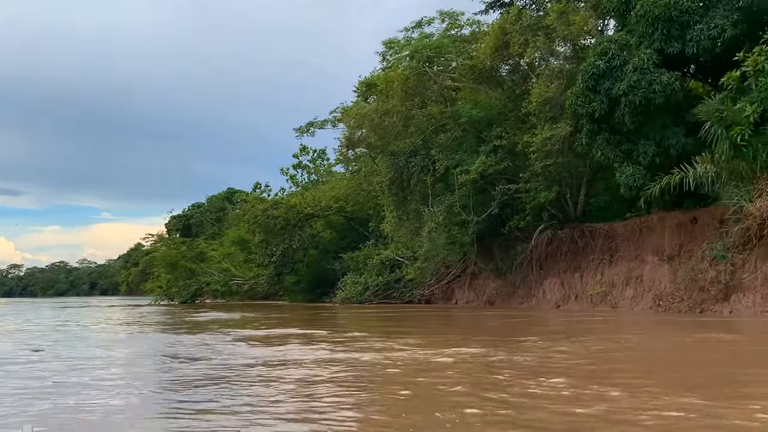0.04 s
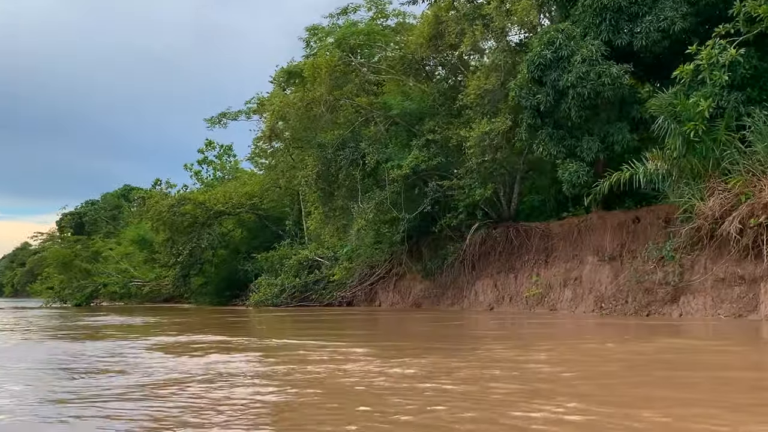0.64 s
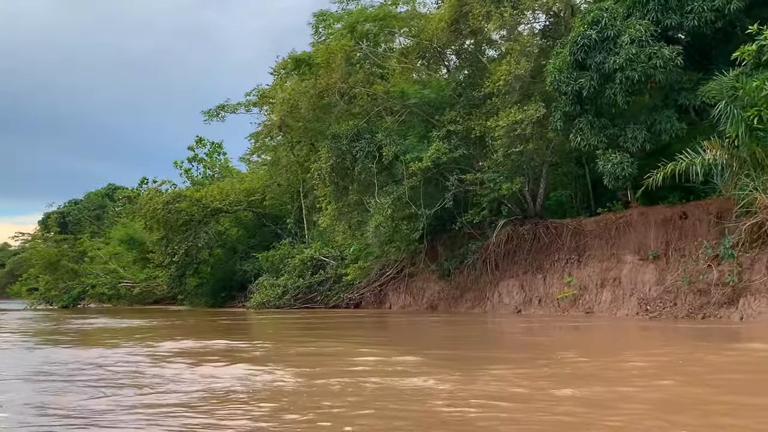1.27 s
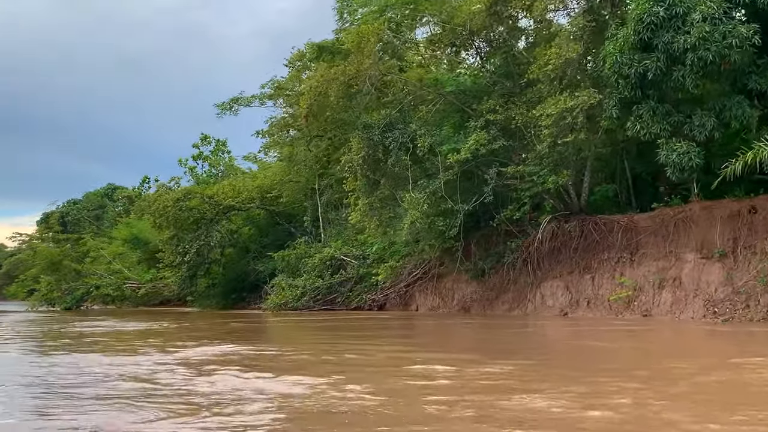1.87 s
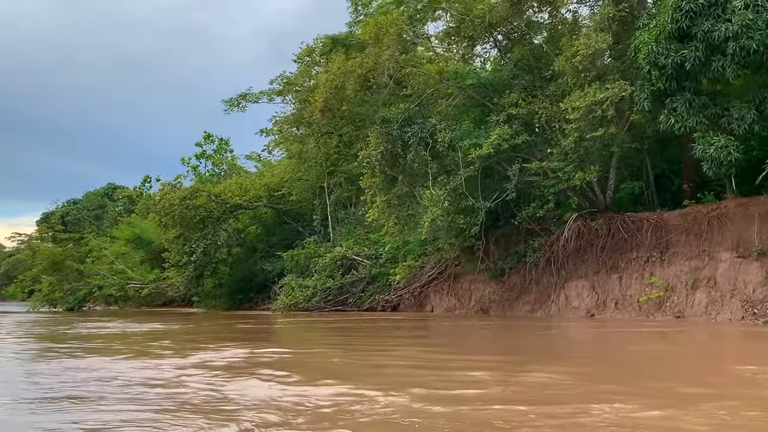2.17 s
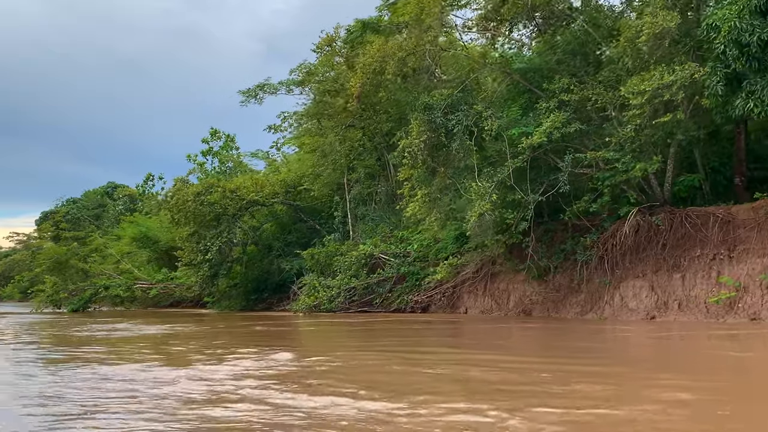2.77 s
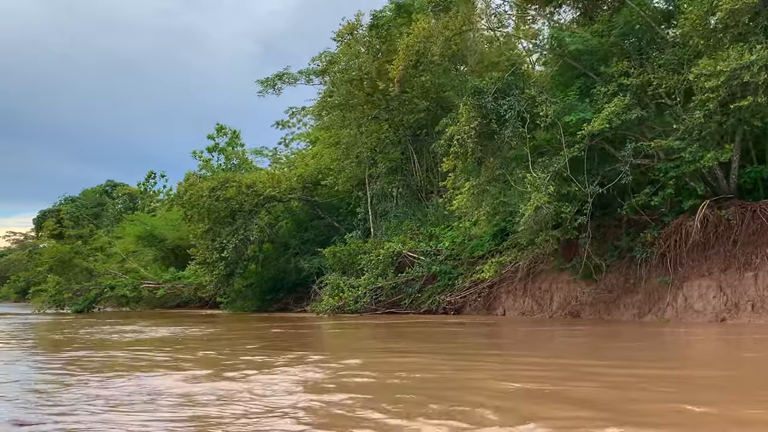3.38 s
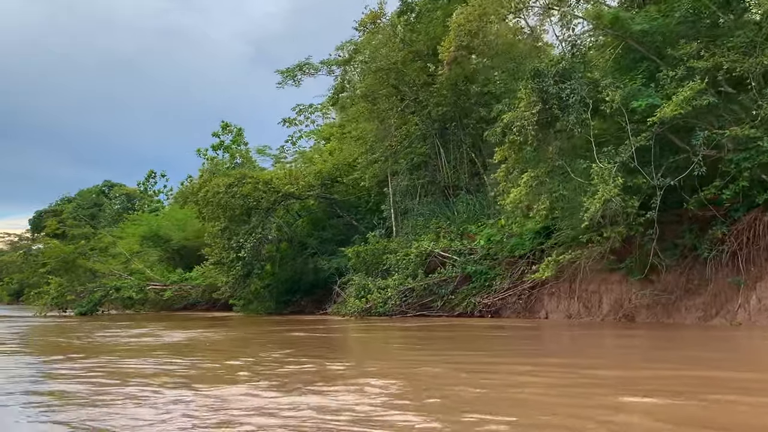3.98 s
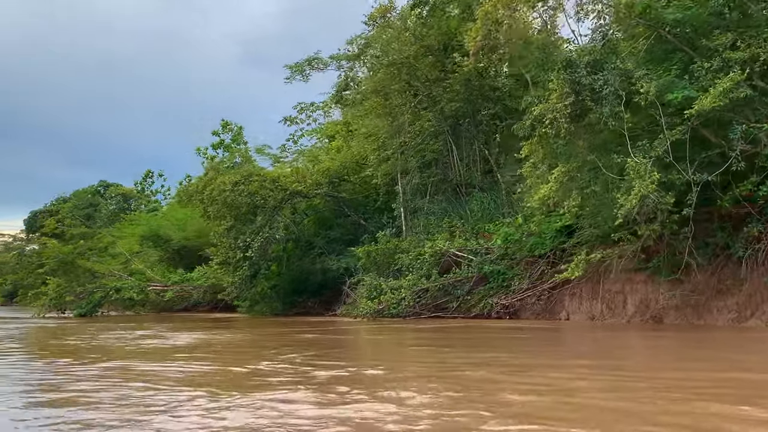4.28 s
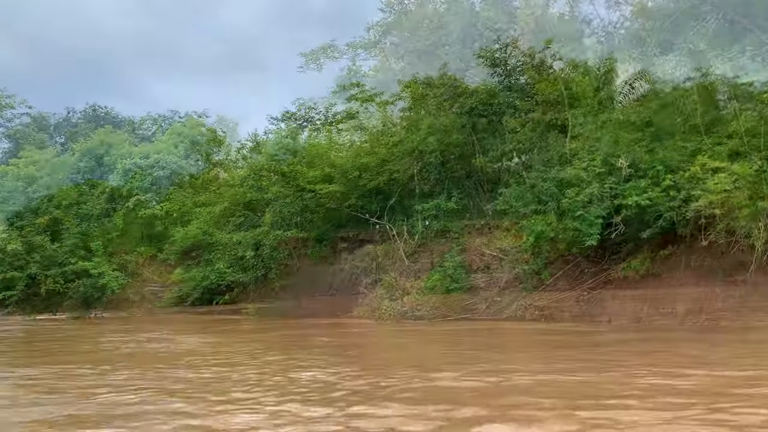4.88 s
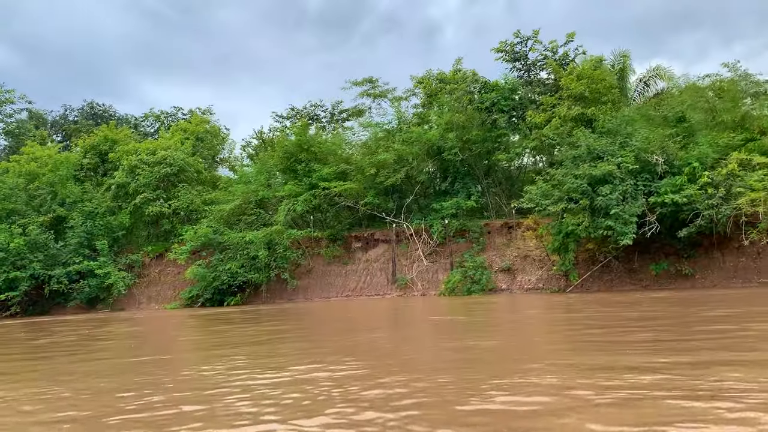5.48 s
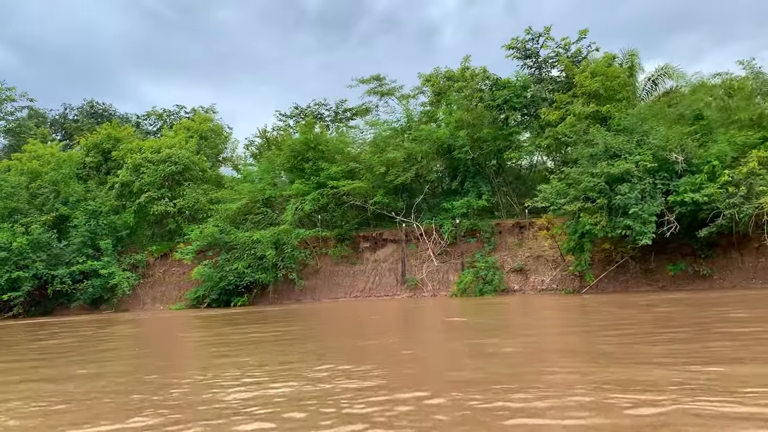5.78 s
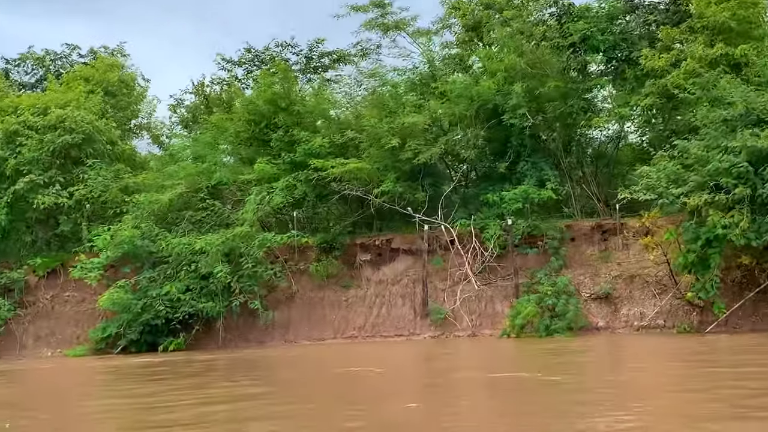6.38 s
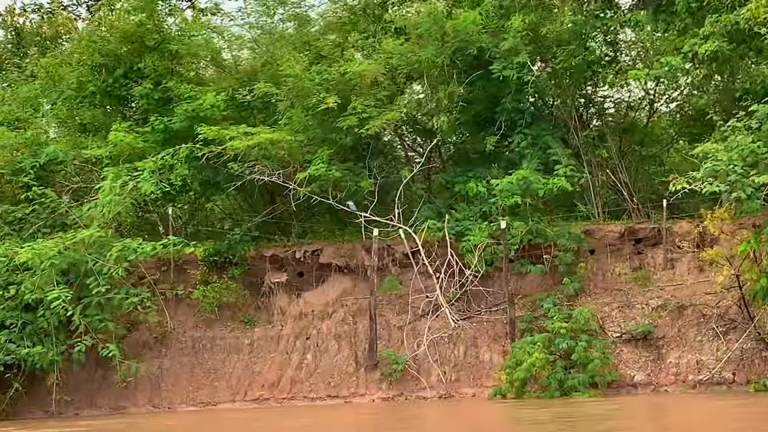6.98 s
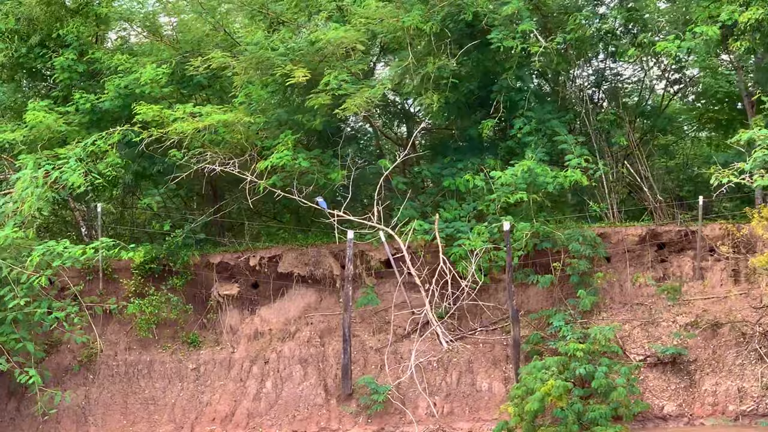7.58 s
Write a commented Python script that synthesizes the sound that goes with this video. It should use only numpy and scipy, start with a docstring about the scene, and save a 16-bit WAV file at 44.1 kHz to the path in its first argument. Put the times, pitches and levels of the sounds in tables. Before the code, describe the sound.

From the start, a one-cylinder boat motor throbs low and steady, about sixteen beats a second, wavering slightly. It is heard from on board, with gusty wind rumble and a rushing bow wave. Waves knock dully under the hull and slap its side with bubbly plops and small droplets, most sharply around 1.5 and 1.7 seconds. Faint short bird whistles come from the bank in the first second and again near 2.4 seconds. More knocks gather between 4 and 4.8 seconds.

From about 4.4 to 5.2 seconds the motor, wind and rush fade into a quieter low drone with gently lapping, trickling water. A faint, high cicada buzz enters and grows slightly. Gurgles and plops cluster around 5.6 seconds and recur until the end. From 6.4 seconds a small bird twitters thinly, joined near 6.9 by a run of soft raspy pips lasting to about 7.6 seconds.

```python
"""A one-cylinder boat motor throbs along a jungle river, its firings exciting exhaust and hull resonances.
Air buffets the boat, the bow wave rushes, and waves slap and knock at the hull, trapping bubbles that ring.
Around five seconds the motor fades away and leaves a low drone, lapping water and the tymbal buzz of
cicadas. A few birds whistle on the bank, their calls scattered by the trees."""
import sys
import numpy as np
from scipy import signal
from scipy.fft import rfft, irfft, next_fast_len
from scipy.io import wavfile
from scipy.ndimage import uniform_filter1d

SR = 44100
rng = np.random.default_rng(int(sys.argv[2]) if len(sys.argv) > 2 else 0)


def master(y):
    """Save y as 16-bit WAV."""
    cut = np.clip(np.atleast_2d(y).T, -1, 1)
    pcm = np.round(cut * 32767)  # scale
    wavfile.write(sys.argv[1], SR, pcm.astype(np.int16))


N = 336924

# likeness of left and right: (frequency [Hz], correlation [0 to 1])
CORRELATION = [(30, 0.89), (300, 0.96), (600, 0.079), (1000, 0.28), (1600, 0.0093), (4500, 0.013),
               (6000, 0.092), (7500, 1), (10000, 1), (16000, 1)]


def from_db(db):
    """Amplitude ratio of a level in decibels."""
    return 10 ** (np.asarray(db) / 20)


def rms_one(x):
    """Normalisation to unit root-mean-square amplitude."""
    return x / np.sqrt(np.mean(x ** 2) + 1e-20)


def match_power(x, envelope):
    """Normalisation to the mean power of an envelope."""
    return rms_one(x) * np.sqrt(np.mean(envelope ** 2))


def decay(t, t60):
    """Exponential damping: 60 dB down after t60 seconds."""
    return from_db(-60 * t / t60)


def in_time(curve):
    """Linear interpolation of (time, value) points at every sample."""
    return np.interp(np.arange(N) / SR, *np.transpose(curve))


def at_hz(points, hz):
    """Interpolation of (frequency, value) points on a logarithmic frequency axis."""
    frequencies, values = np.transpose(points)
    return np.interp(np.log(hz), np.log(frequencies), values)


def ramp(start_s, length_s):
    """Linear rise from 0 to 1."""
    return np.clip((np.arange(N) / SR - start_s) / length_s, 0, 1)


def drift(corner_hz):
    """Random modulation: low-passed noise of unit spread, computed on every 40th sample."""
    pole = np.exp(-2 * np.pi * corner_hz * 40 / SR)
    slow = signal.lfilter([1], [1, -2 * pole, pole * pole], rng.standard_normal(N // 40 + 2002))[2000:]
    return np.interp(np.arange(N) / 40, np.arange(len(slow)), rms_one(slow))


def band(x, low_hz, high_hz):
    """Butterworth band-pass filter."""
    sections = signal.butter(2, [low_hz, min(high_hz, .48 * SR)], "band", fs=SR, output="sos")
    return signal.sosfilt(sections, x + 1e-18)


def resonate(x, hz, width_hz):
    """Damped resonator with unit gain at its peak."""
    r = np.exp(-np.pi * width_hz / SR)
    feedback = [1, -2 * r * np.cos(2 * np.pi * hz / SR), r * r]
    return signal.lfilter(np.array([1, 0, -1]) * (1 - r * r) / 2, feedback, x + 1e-18)


def stereo(pair, correlation):
    """Sum and difference of two independent signals give partly correlated left and right."""
    mid = np.sqrt(1 + correlation) * pair[0]
    side = np.sqrt(1 - correlation) * pair[1]
    return np.array([mid + side, mid - side]) / np.sqrt(2)


def add(out, s, sound):
    """Superposition of a sound starting at s seconds."""
    i = max(0, round(s * SR))
    out[..., i:i + sound.shape[-1]] += sound[..., :N - i]


def banded_noise(spectrum, patchy_db, surge_db, correlation=None):
    """Amplitude-modulated noise: half-octave bands surge together and flicker apart."""
    out, surge = 0, surge_db * drift(16)
    edges = 20 * 2 ** np.arange(0, 10.1, .5)
    white = rng.standard_normal((2, 2, N))
    for k, (low, high) in enumerate(zip(edges, edges[1:])):
        hz = np.sqrt(low * high)
        if spectrum[0][0] <= hz <= spectrum[-1][0] * np.sqrt(2):
            gain = from_db(at_hz(spectrum, hz) + surge + patchy_db * drift(24))
            alike = at_hz(CORRELATION, hz) if correlation is None else correlation
            out = out + gain * stereo(band(white[k % 2], low, high), alike)
    return rms_one(out)


def periodic_wave(turns, harmonics=64):
    """Fourier series: equally strong harmonics in random phase repeat on every turn."""
    cycle = irfft(np.r_[0, np.exp(2j * np.pi * rng.random(harmonics))], 2048)
    return rms_one(np.interp(turns % 1, np.linspace(0, 1, len(cycle)), cycle))


def motor(jitter_turns=.009, uneven_db=4.5, easing_db_per_s=.27, churn_db=2):
    """Forced vibration: one cylinder's shake, thump and puff of gas drive exhaust and hull resonances."""
    # engine speed: (time [s], firing rate [Hz])
    speed = [(0, 15.9), (.4, 16.05), (.8, 15.75), (1.3, 15.1), (1.8, 15.68), (2.1, 15.68), (2.42, 15.35),
             (2.78, 16.27), (3.4, 16.25), (3.65, 16.05), (4.8, 16.55)]
    # exhaust and hull resonances: (frequency [Hz], bandwidth [Hz], level [dB])
    modes = [(61.3, 45, 2.5), (81, 27, 3.5), (130.8, 21, 4), (158.2, 26, 1.5), (182.2, 23, 0),
             (240, 85, -11), (315.4, 31, -.5), (350.5, 20, 1.5), (383, 24, -3.5), (519.7, 24.3, -8),
             (578, 22, -10.5), (905, 1100, -26.5)]
    churn = churn_db * drift(9.7)   # water washing over the exhaust makes its level waver
    level_db = -26 - easing_db_per_s * np.arange(N) / SR + churn
    turns = np.cumsum(in_time(speed)) / SR + jitter_turns * drift(3.7)
    shake = periodic_wave(turns) + .56 * drift(2.6) * periodic_wave(turns)   # shape varies with the load
    firings = np.diff(np.floor(turns), prepend=0) * from_db(uneven_db * rng.standard_normal(N))
    gas = band(stereo(rng.standard_normal((2, N)), .11), 32, 1200)
    puffs = rms_one(np.exp(-1.5 * (turns % 1)) * gas)
    drive = shake + .25 * rms_one(band(firings, 31, 1220)) + .58 * puffs
    size = next_fast_len(N)
    f = np.arange(size // 2 + 1) * SR / size
    power = sum((from_db(db) / (1 + (2 * (f - hz) / width) ** 2)) ** 2 for hz, width, db in modes)
    return from_db(level_db) * rms_one(irfft(rfft(drive, size) * np.sqrt(power), size)[:, :N])


def buffeting():
    """Turbulent pressure: gusts of air against the boat make a low rumble."""
    # gust strength: (time [s], level [dB])
    gusts = [(0, -2), (.8, 2.5), (1.3, -2.5), (2.15, 1.5), (2.3, -9), (2.76, 0.5), (2.83, 3), (3.2, -1),
             (4.2, 1)]
    # rumble of the air: (frequency [Hz], spectral density [dB])
    spectrum = [(15, -14), (28, -4), (50, 2), (90, -3.5), (160, -8.5), (230, -14), (300, -17), (500, -19.5),
                (1500, -72)]
    return from_db(-28.5 + in_time(gusts)) * banded_noise(spectrum, patchy_db=2.5, surge_db=.5)


def bubbles(per_s, spread_db, low_hz, high_hz, q, pitches=16):
    """Bubble resonance: random impulses ring a range of pitches; small bubbles are higher and fainter."""
    strengths = from_db(spread_db * np.minimum(rng.exponential(1, N), 3)) * rng.choice([-1, 1], N)
    impulses = strengths * (rng.random(N) < per_s / SR)
    out, pitch_index = 0, rng.integers(0, pitches, N)
    for k, hz in enumerate(np.geomspace(low_hz, high_hz, pitches)):
        kicks = impulses * (pitch_index == k) * rng.standard_normal((2, N))
        out = out + stereo(resonate(kicks, hz, hz / q), at_hz(CORRELATION, hz)) / hz
    return rms_one(out)


def bow_wave():
    """Air entrainment: the rushing bow wave swells together with its bubbles and fine fizz."""
    # strength of the bow wave: (time [s], level [dB])
    wash = [(0, 2), (.12, -1.5), (.2, 0), (.6, 2), (1.0, 1.5), (1.35, -1), (1.7, 1.1), (2.05, 0),
            (2.55, -0.5), (2.75, 1), (3.25, 1.5), (3.62, -0.5), (3.78, 1), (4.35, -0.1), (4.65, 1.5),
            (4.8, 4)]
    # rushing water: (frequency [Hz], spectral density [dB])
    spectrum = [(100, -33), (330, -35), (450, 8), (700, 1), (1300, -4), (2500, -14.5), (5000, -16),
                (7000, -22), (10500, -23.5), (13000, -24.5), (16000, -50)]
    rush = from_db(-39) * banded_noise(spectrum, patchy_db=1.6, surge_db=.7)
    froth = from_db(-49) * bubbles(per_s=420, spread_db=3, low_hz=650, high_hz=3380, q=32, pitches=24)
    fizz = from_db(-57) * bubbles(per_s=800, spread_db=4, low_hz=2600, high_hz=9000, q=18)
    return from_db(in_time(wash)) * (rush + froth + fizz) * from_db([[.3], [-.3]])


def whistle(length_s, start_hz, end_hz, rasp):
    """Frequency modulation: a note glides while noise shakes its pitch by the fraction rasp."""
    progress = np.linspace(0, 1, int(length_s * SR))
    shake = rms_one(uniform_filter1d(rng.standard_normal(len(progress)), size=50))
    hz = (start_hz + (end_hz - start_hz) * progress) * (1 + rasp * shake)
    return np.sin(np.pi * progress) * np.sin(2 * np.pi * np.cumsum(hz) / SR)


def scattered(call, t60, echo_db=-1):
    """Scattering: the bank and the trees follow a call with a diffuse, dying echo."""
    t = np.arange(SR // 3) / SR
    leaves = rng.standard_normal((2, len(t))) * decay(t, t60) * (t > .008)
    echo = signal.fftconvolve(call[None], rms_one(leaves) / np.sqrt(len(t)), axes=1)[:, :N]
    return call + from_db(echo_db) * echo


def birds():
    """Frequency sweeps, scattered by leaves: whistles, a thin twitter and a run of raspy pips."""
    # whistled notes: (time [s], length [s], start pitch [Hz], end pitch [Hz], level [dB])
    notes = [(0.183, 0.018, 3180, 2950, -46.5), (0.27, 0.054, 2430, 2190, -43), (.37, .06, 4200, 4370, -54),
             (0.437, 0.017, 3950, 3700, -40.5), (0.57, 0.037, 3050, 3100, -45),
             (0.616, 0.047, 4850, 4950, -50), (0.618, 0.059, 2420, 2220, -45.5),
             (2.432, 0.054, 2440, 2160, -44.5)]
    # a small bird's twitter: (time [s], length [s], start pitch [Hz], end pitch [Hz], level [dB])
    sweeps = [(6.424, 0.02, 4250, 4200, -56.5), (6.522, .012, 4300, 5300, -55),
              (6.529, .02, 5150, 5600, -50.5), (6.607, .012, 3300, 3550, -54),
              (6.645, .01, 4170, 5400, -55.5), (6.649, 0.042, 3900, 4450, -55.5),
              (6.684, 0.015, 3950, 5400, -55), (6.687, 0.027, 5950, 6100, -49.5),
              (6.71, .009, 5600, 4400, -53), (6.756, .04, 3380, 3620, -53), (6.76, .06, 5250, 5000, -54),
              (6.886, .014, 4750, 5650, -53), (6.898, .03, 5870, 6200, -49), (6.94, 0.025, 5400, 3700, -58)]
    # another bird's repeated pip: (time [s], level [dB])
    pip_run = [(6.862, -50.5), (6.939, -49), (7.007, -52), (7.104, -50), (7.194, -50), (7.285, -49.5),
               (7.383, -53), (7.485, -47.5), (7.578, -46.5)]
    song, twitter, pips = np.zeros((3, N))
    t = np.arange(SR // 8) / SR
    for voice, rows, rasp in (song, notes, .032), (twitter, sweeps, .02):
        for s, length_s, start_hz, end_hz, db in rows:
            add(voice, s, from_db(db) * whistle(length_s, start_hz, end_hz, rasp))
    for s, db in pip_run:   # each pip falls, jumps up into a second fall and breaks into a hoarse tail
        add(pips, s, from_db(db) * whistle(.014, 2900 * rng.uniform(.98, 1.03), 2480, rasp=.045))
        add(pips, s + .008, from_db(db - 5) * whistle(.018, 3350, 2750, rasp=.08))
        hoarse = rms_one(band(band(rng.standard_normal(len(t)), 1300, 3300), 1300, 3100))
        add(pips, s + .014, from_db(db - 3) * hoarse * decay(t, .088))
    calls = scattered(song, t60=.3) + scattered(twitter, t60=.26) + scattered(pips, t60=.13)
    return calls * from_db([[-1], [1]])


def slaps(attack_s=.0032, gulp_q=2.7, grain_db=6, gurgle_db=-8, crack_db=-5):
    """Impact and cavity resonance: a wave cracks on the hull, sprays, and traps air that gulps."""
    # waves on the hull: (time [s], level [dB], trapped-air pitch [Hz], relative spray [dB], t60 [s])
    waves = [(.252, -44, 616, -13, 0.029), (.815, -36, 1270, -15, 0.17), (.924, -32, 1470, -6, 0.08),
             (1.443, -39.5, 1770, 0, 0.18), (1.529, -19.5, 607, -13, 0.046), (1.547, -27, 1080, -6.5, 0.11),
             (1.689, -44, 1480, 7, 0.11), (1.742, -22.5, 1370, -11.5, 0.053),
             (1.945, -38.5, 1504, -1, 0.17), (2.213, -32, 598, -3.5, 0.19),
             (2.669, -35.5, 1220, -11, 0.098), (2.921, -45.5, 1540, -16, 0.17),
             (3.263, -39.5, 1600, -8, 0.14), (3.488, -32, 578, -22, 0.27), (3.547, -33, 680, -26, 0.055),
             (4.334, -48, 1880, 9, 0.15), (4.36, -42.5, 1045, -10, 0.19), (4.955, -36.5, 1160, -9, 0.065),
             (5.175, -37, 710, -29, 0.087), (5.462, -40, 1580, -19, 0.088), (5.568, -32, 727, -12, 0.33),
             (5.61, -33.5, 342, -28, 0.69), (5.641, -36, 1190, -22, 0.13), (5.679, -38, 647, -14, 0.16),
             (5.952, -32.5, 597, -15, 0.26), (6.037, -40.5, 1000, -5, 0.15), (6.12, -39, 850, -13, 0.2),
             (6.163, -36.5, 743, -16, 0.19), (6.342, -36.5, 1310, -18, 0.15),
             (6.371, -33.5, 1000, -14, 0.16), (6.498, -43.5, 1140, -5, 0.27),
             (6.664, -33.5, 1320, -10, 0.07), (6.884, -40, 1544, -9, 0.13), (7.211, -38.5, 1790, -6, 0.15),
             (7.23, -25, 1172, -22, 0.088), (7.38, -35, 674, -17, 0.11), (7.392, -34.5, 400, -25, 0.39),
             (7.448, -42, 610, -6, 0.15)]
    out, t = np.zeros((2, N)), np.arange(SR // 3) / SR
    for s, db, hz, spray_db, t60 in waves:
        swell = np.minimum(t / attack_s, 1) * decay(t, t60)
        tail = np.minimum(t / .0062, 1) * decay(t, 1.3 * t60)
        snap = decay(t, .023)
        grains = rng.standard_normal((2, len(t)))
        grains *= from_db(grain_db * np.clip(rng.standard_normal(len(t)), -3, 3))
        cavity = resonate(swell * stereo(grains, .73), hz, hz / gulp_q)
        gulp = match_power(band(cavity, 115, 1350), swell)
        bubble_hz = hz * rng.uniform(.57, 1.7, size=4)   # the wave gurgles away in four bubbles
        rings = sum(resonate(stereo(grains, .21), f, width_hz=11) for f in bubble_hz)
        gurgle = from_db(gurgle_db) * match_power(tail * rings, tail)
        spray = match_power(band(swell * stereo(grains, .17), 450, 2540), swell)
        crack = from_db(crack_db) * match_power(band(snap * stereo(grains, .69), 620, 3700), snap)
        add(out, s - attack_s, from_db(db) * (gulp + gurgle + from_db(spray_db) * (spray + crack)))
    return out * from_db([[1.3], [-1.3]])


def plops(attack_s=.002, rise_per_s=.38, wobble=.038):
    """Damped bubble oscillation: the pitch wobbles with the shape and rises a little near the surface."""
    # single large bubbles: (time [s], level [dB], pitch [Hz], t60 [s])
    large_bubbles = [(.595, -36, 1780, .08), (1.452, -35, 2050, .06), (1.529, -14.5, 540, .04),
                     (1.542, -22, 255, .12), (1.744, -17.5, 900, .045), (2.213, -24, 600, .05),
                     (2.945, -34, 1600, .07), (3.489, -23, 640, .07), (4.054, -27, 973, .14),
                     (4.172, -33, 1560, .07), (4.747, -16, 245, .08), (5.571, -18.5, 800, .085),
                     (5.61, -26, 570, .1), (5.652, -29, 1346, .1), (5.672, -28, 326, .18),
                     (5.956, -28, 600, .08), (5.975, -27, 383, .09), (6.039, -32, 1040, .06),
                     (6.341, -34, 1340, .08), (6.371, -26, 580, .08), (7.394, -26, 520, .06)]
    out, t = np.zeros(N), np.arange(SR // 5) / SR
    for s, db, hz, t60 in large_bubbles:
        shape = rms_one(uniform_filter1d(rng.standard_normal(len(t)), size=160))
        pitch_hz = hz * (1 + rise_per_s * t + wobble * shape)
        ring = np.sin(2 * np.pi * np.cumsum(pitch_hz) / SR) * decay(t, t60)
        add(out, s, from_db(db) * np.minimum(t / attack_s, 1) * ring)
    return out * from_db([[.8], [-.8]])


def knocks(attack_s=.00688, thud_band_hz=(50, 230)):
    """Impulse response: water heaves under the hull, which flexes briefly over a soft thud."""
    # dull knocks under the hull: (time [s], level [dB])
    heaves = [(.785, -12.5), (0.824, -13), (1.121, -12.5), (1.545, -18), (2.198, -17), (2.815, -11.5),
              (3.1, -11), (4.005, -19), (4.194, -13.5), (4.443, -13.5), (4.727, -12), (4.757, -14),
              (5.676, -30.5), (7.398, -19), (7.445, -25.5)]
    out, t = np.zeros((2, N)), np.arange(SR // 4) / SR
    rise = np.minimum(t / attack_s, 1)
    for s, db in heaves:
        push = rise * decay(t, .18) * stereo(rng.standard_normal((2, len(t))), .86)
        thud = band(band(push, *thud_band_hz), *thud_band_hz)
        flex_hz = 115 * rng.uniform(.8, 1.25)
        flex = rise * decay(t, .041) * np.sin(2 * np.pi * flex_hz * t)
        add(out, s - attack_s, from_db(db - 5) * thud / np.abs(thud).max())
        add(out, s, from_db(db - 3) * flex / np.abs(flex).max())
    return out


def droplets(spatter_db=-1, grain_db=4):
    """Drop impact: each landing excites a tiny high resonance and a grainy spatter."""
    # droplets landing: (time [s], peak level [dB], t60 [s])
    landings = [(.856, -40, 0.067), (1.446, -41, 0.1), (1.524, -36, 0.17), (1.738, -40, .1),
                (1.935, -38, .16), (2.054, -35, .06), (2.731, -42, .06), (3.164, -29.5, 0.035),
                (4.713, -38.5, .17), (6.111, -48, .04), (7.013, -42, .05)]
    out, t = np.zeros((2, N)), np.arange(SR // 4) / SR
    for s, db, t60 in landings:
        grains = rng.standard_normal(len(t)) * decay(t, t60)
        grains *= from_db(grain_db * np.clip(rng.standard_normal(len(t)), -2, 2))
        ring = rms_one(resonate(grains, hz=8200, width_hz=1100))
        drop = ring + from_db(spatter_db) * rms_one(band(grains, 8500, 10000))
        add(out, s, from_db(db) * drop / np.abs(drop).max())
    return out


def drone():
    """Narrow-band noise: a low hum stands out of a broader, surging rumble."""
    # low rumble: (frequency [Hz], spectral density [dB])
    spectrum = [(15, -23), (30, -3), (65, -6.5), (100, -0.5), (128, -5.5), (200, -7), (300, -14),
                (450, -62), (1500, -67)]
    low_noise = band(stereo(rng.standard_normal((2, N)), .23), 101, 141)
    hum = rms_one(resonate(low_noise, hz=126.5, width_hz=17.5))
    rumble = banded_noise(spectrum, patchy_db=1.5, surge_db=2, correlation=.55)
    return from_db(-35.5) * rumble + from_db(-36.5) * hum


def lapping(adrift_s, settle_db_per_s=2.5):
    """Flow noise and bubble resonance: water laps ever more gently along the drifting hull."""
    # lapping water: (frequency [Hz], spectral density [dB])
    spectrum = [(120, -10), (300, 5), (440, 8.5), (680, 6.5), (1000, -1), (2000, -23.5), (4000, -22),
                (6000, -31), (8000, -55), (16000, -55)]
    lap = from_db(-39) * banded_noise(spectrum, patchy_db=3.5, surge_db=-1)
    froth = from_db(-54) * bubbles(per_s=300, spread_db=2, low_hz=557, high_hz=3950, q=63)
    return from_db(-settle_db_per_s * adrift_s) * (lap + froth)


def cicadas(adrift_s, nearing_db_per_s=1, waver_db=1.1):
    """Body resonance: countless tymbal clicks merge into a buzz that grows as the bank comes nearer."""
    # the insects' body resonances: (frequency [Hz], bandwidth of each filter pass [Hz], level [dB])
    modes = [(6100, 980, -2), (6660, 740, 6), (7070, 260, -2)]
    chorus = 0
    for hz, width, db in modes:
        clicks = stereo(rng.standard_normal((2, N)), .21)
        buzz = resonate(resonate(clicks, hz, width), hz, width)
        chorus = chorus + from_db(db + waver_db * drift(23)) * buzz
    chorus = rms_one(band(band(chorus, 4700, 7500), 4700, 7500))
    return from_db(-56 + nearing_db_per_s * adrift_s) * chorus * from_db([[-1.3], [1.3]])


def ripples(attack_s=.009, bubble_db=1, bubble_q=16, grain_db=1):
    """Air entrainment: each ripple splashes, frees a few ringing bubbles and runs off into a trickle."""
    # ripples breaking along the hull: (time [s], level [dB], t60 [s], nominal bubble pitch [Hz])
    breaks = [(5.126, -51, 0.37, 1110), (5.288, -48, 0.12, 2580), (5.446, -53, 0.077, 1650),
              (5.6, -55, 0.7, 1390), (5.672, -45.5, 0.22, 1510), (5.951, -48, 0.056, 2560),
              (6.112, -50, 0.048, 2830), (6.498, -49.5, 0.23, 1700), (6.722, -45, 0.084, 1480),
              (6.764, -50.5, 0.3, 3360), (7.013, -49, 0.1, 2800), (7.225, -43, 0.045, 2100),
              (7.378, -48, 0.19, 2600), (7.448, -47, 0.11, 2490)]
    # trickling water: (frequency [Hz], spectral density [dB])
    spectrum = [(500, 4), (1500, 16), (4000, 9), (8000, 1.5), (12200, -3.5), (16000, -30)]
    flow = from_db(-65 + 8.5 * np.tanh(drift(13)))   # a faint uneven trickle goes on between ripples
    burble, t = np.zeros((2, N)), np.arange(SR // 2) / SR
    for s, db, t60, hz in breaks:
        splash = np.minimum(t / attack_s, 1) * decay(np.maximum(t - attack_s, 0), t60)
        add(flow, s - attack_s / 2, from_db(db) * splash)
        bubble_hz = hz * rng.uniform(.835, 1.12, size=3)
        rings = sum(resonate(splash * rng.standard_normal((2, len(t))), f, f / bubble_q) for f in bubble_hz)
        add(burble, s, from_db(db + bubble_db) * match_power(band(rings, 640, 4000), splash))
    drops = rms_one(from_db(grain_db * drift(140)))   # a splash is made of single drops
    return burble + flow * drops * banded_noise(spectrum, patchy_db=2, surge_db=1.5)


def scene(motor_fades_at_s=4.42, adrift_at_s=4.36, fade_s=.77):
    """Superposition: the running boat fades into the quiet of the bank; waves and birds span both."""
    adrift_s = np.maximum(np.arange(N) / SR - adrift_at_s, 0)
    running = motor() + buffeting() + bow_wave()
    drifting = drone() + lapping(adrift_s) + cicadas(adrift_s) + ripples()
    bed = (1 - ramp(motor_fades_at_s, fade_s)) * running + ramp(adrift_at_s, fade_s) * drifting
    return bed + slaps() + plops() + knocks() + droplets() + birds()


def record(dry, cutoff_hz=15750):
    """Phase difference: two microphone ports hear the sound slightly out of step; the top is cut."""
    # phase between the ports: (frequency [Hz], lead of the left [rad])
    port_phase = [(0, 0), (250, 0), (500, .4), (900, 0), (1400, .7), (2200, 0), (5500, 0), (6700, .6),
                  (7500, 0), (13800, -6.28), (22050, -14.5)]
    size = next_fast_len(N + SR // 10)
    phase = np.interp(np.arange(size // 2 + 1) * SR / size, *np.transpose(port_phase))
    left = irfft(rfft(dry[0], size) * np.exp(1j * phase), size)[:N]
    low_pass = signal.ellip(10, .1, 90, cutoff_hz, fs=SR, output="sos")
    return signal.sosfilt(low_pass, np.array([left, dry[1]]))


dry = scene()
out = record(dry)
master(out)
```